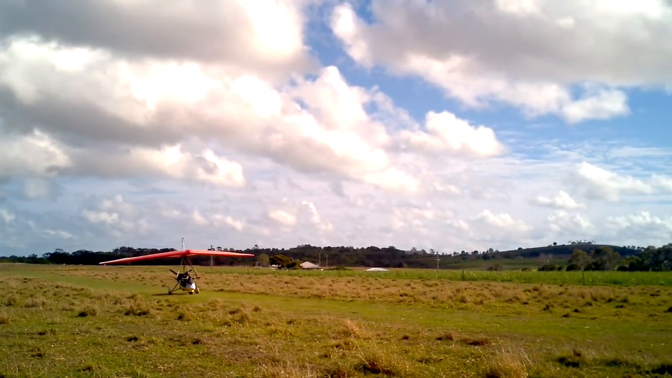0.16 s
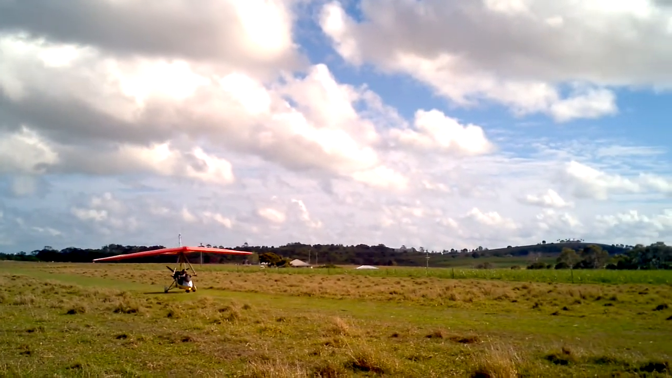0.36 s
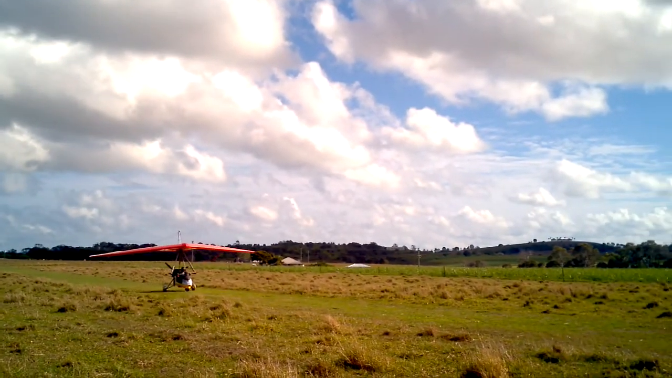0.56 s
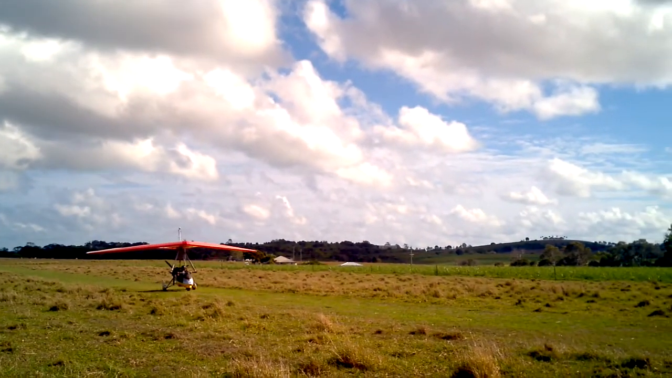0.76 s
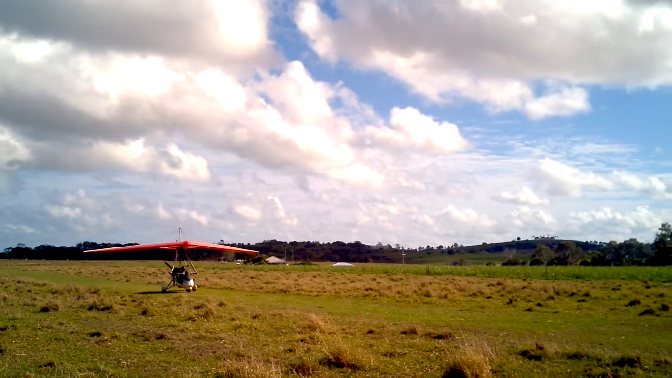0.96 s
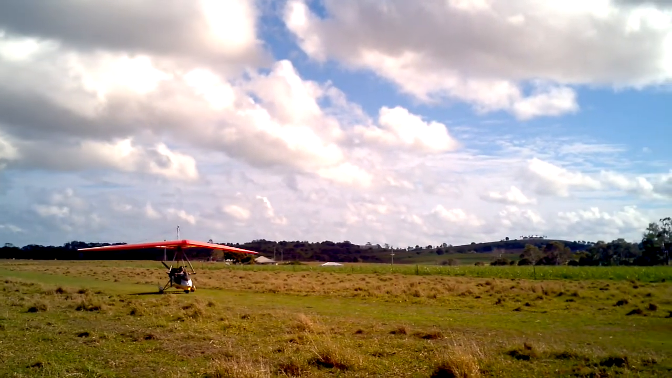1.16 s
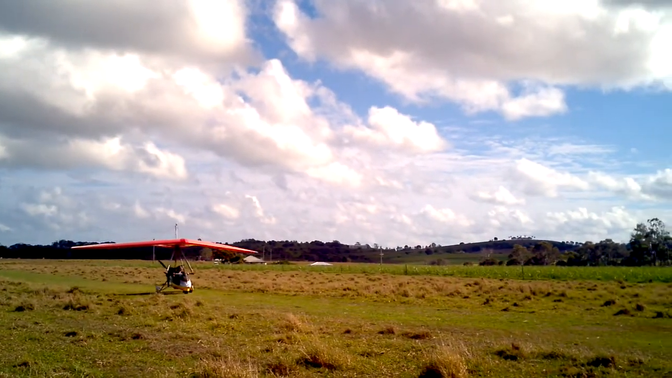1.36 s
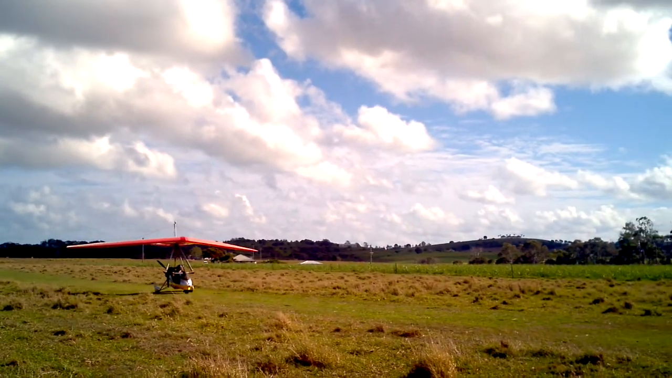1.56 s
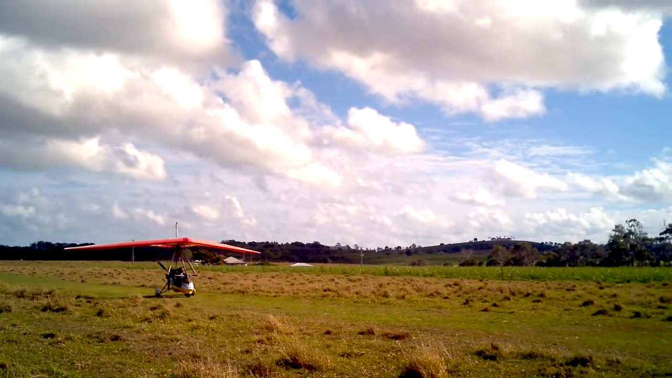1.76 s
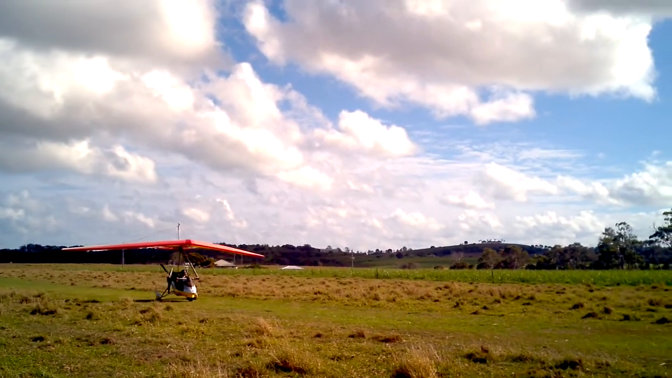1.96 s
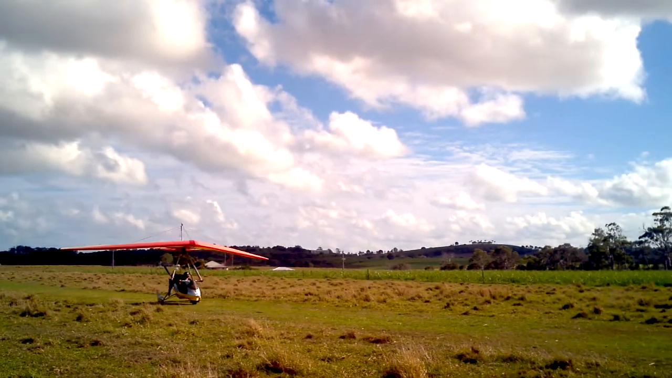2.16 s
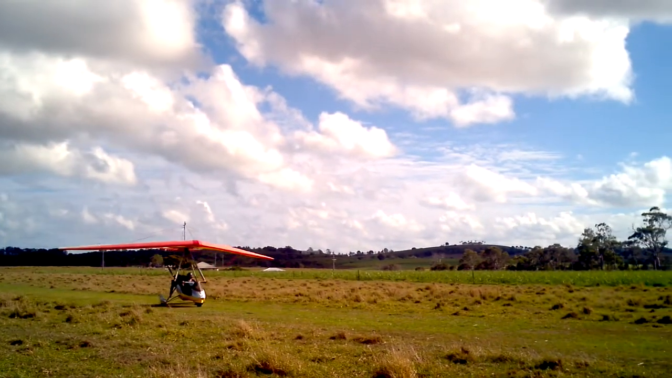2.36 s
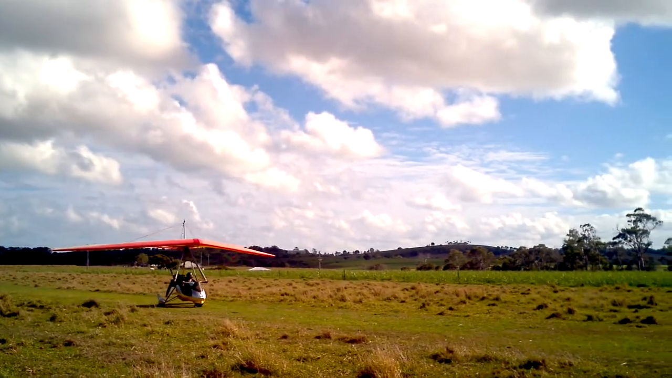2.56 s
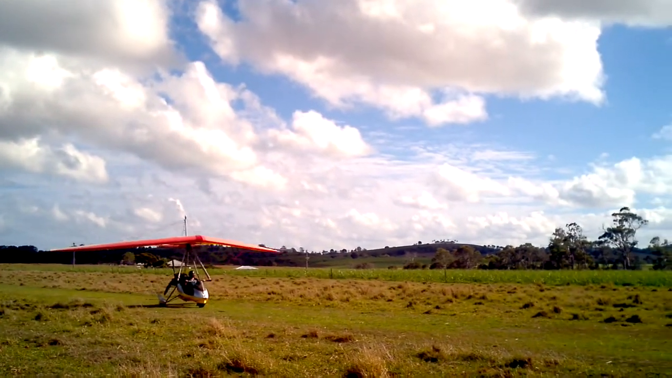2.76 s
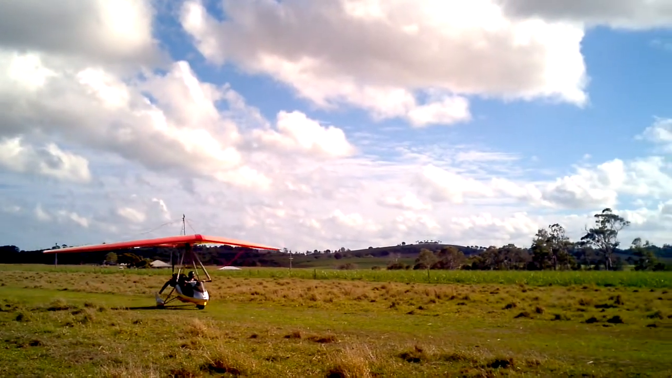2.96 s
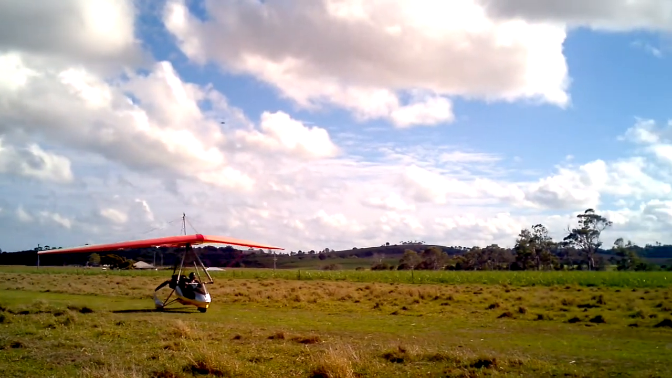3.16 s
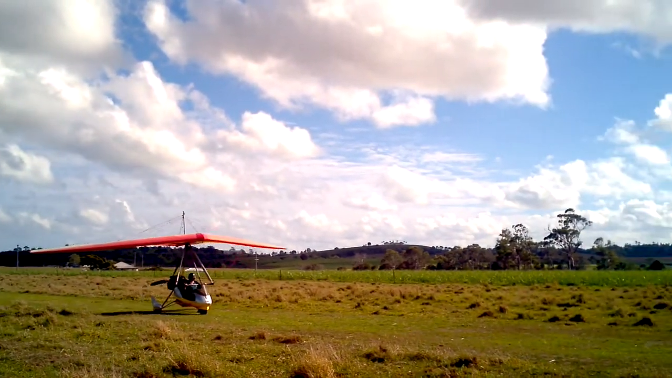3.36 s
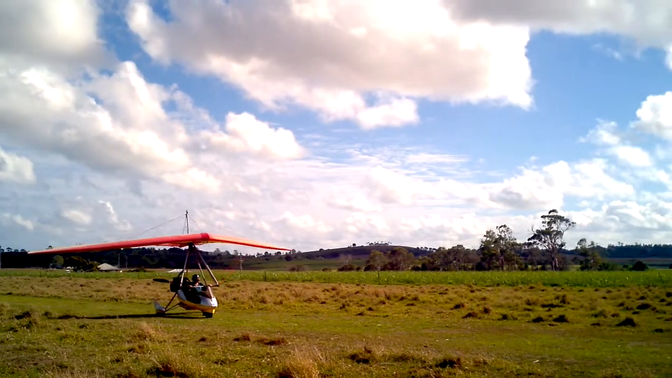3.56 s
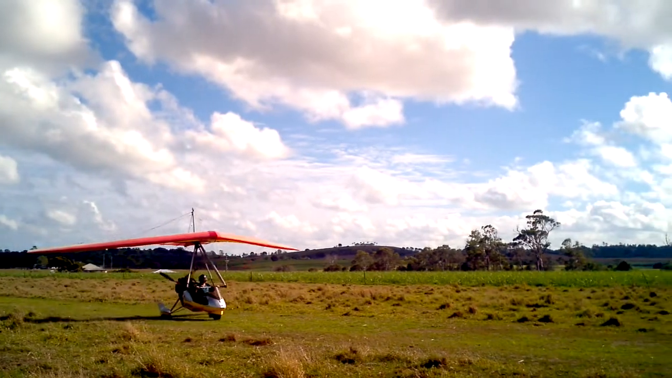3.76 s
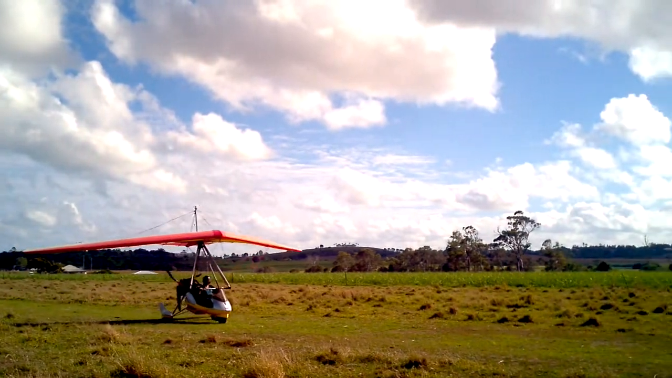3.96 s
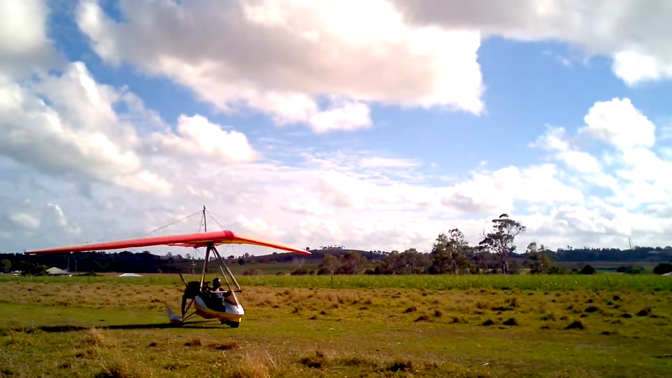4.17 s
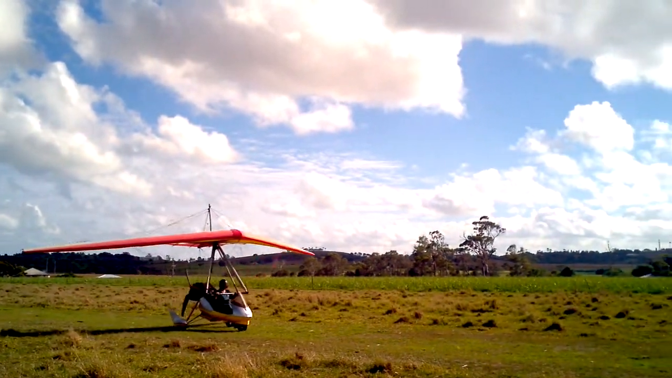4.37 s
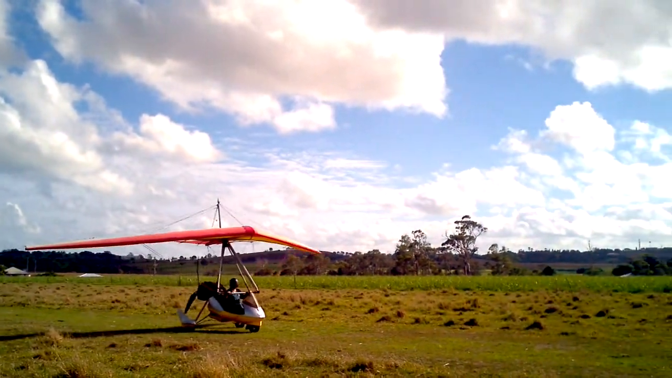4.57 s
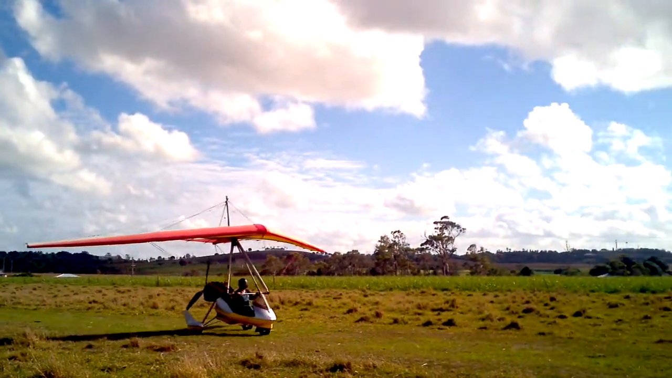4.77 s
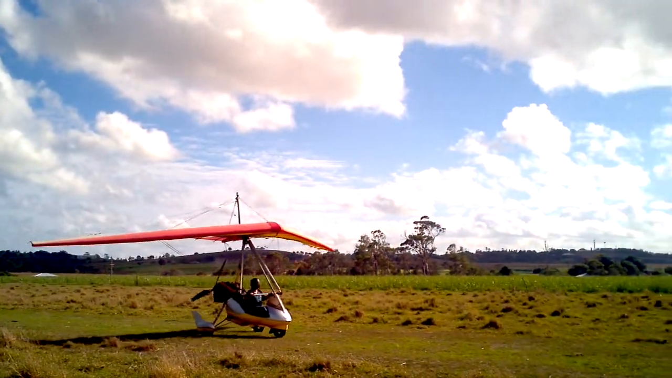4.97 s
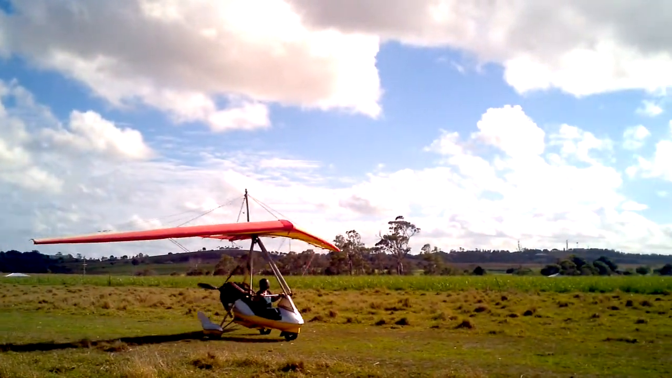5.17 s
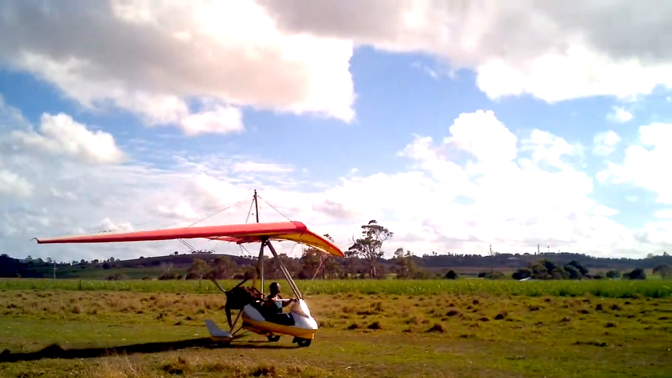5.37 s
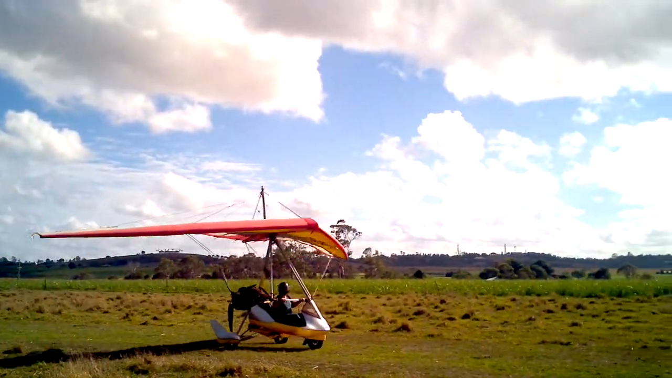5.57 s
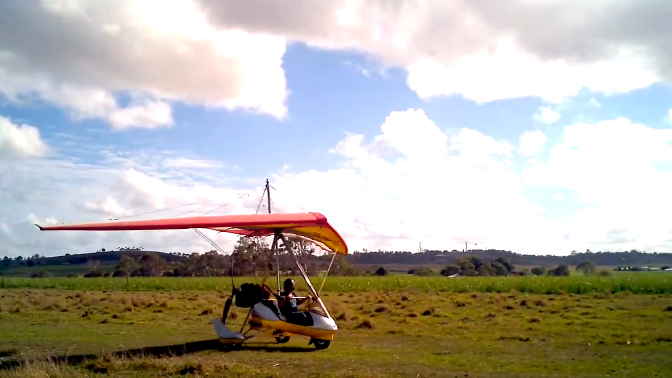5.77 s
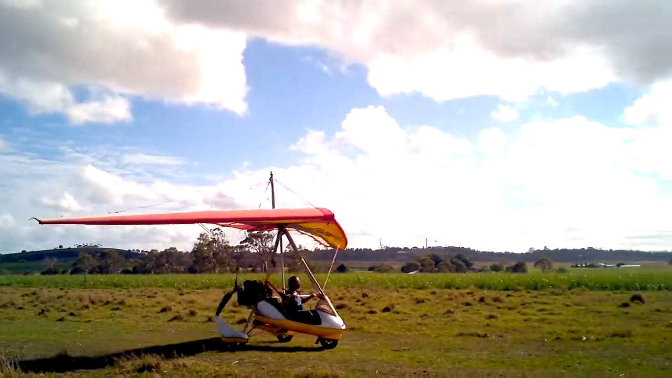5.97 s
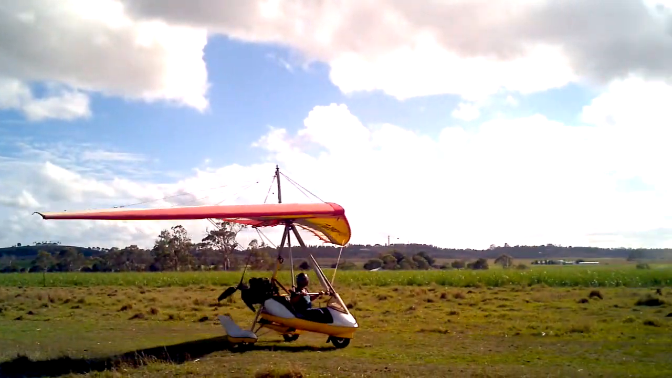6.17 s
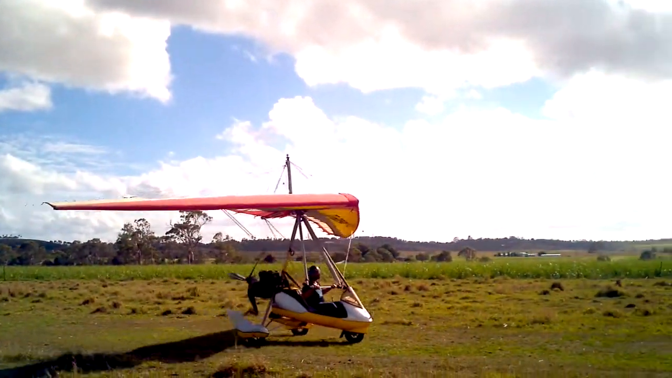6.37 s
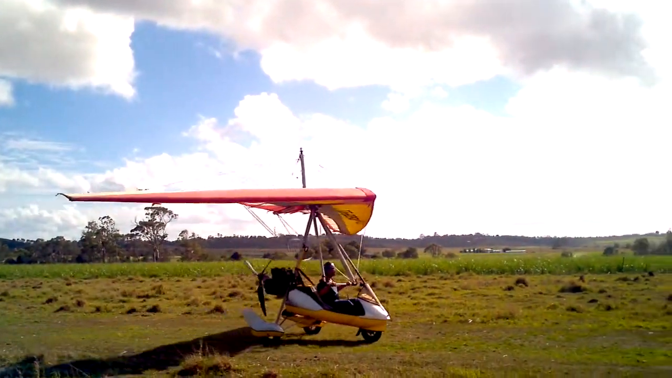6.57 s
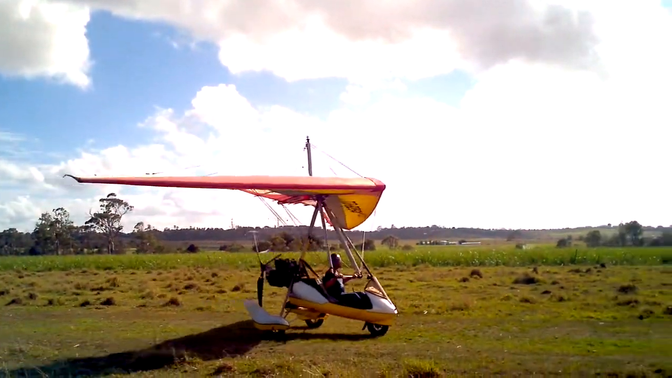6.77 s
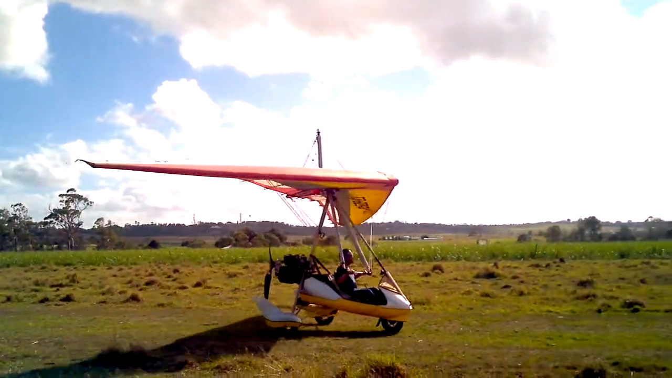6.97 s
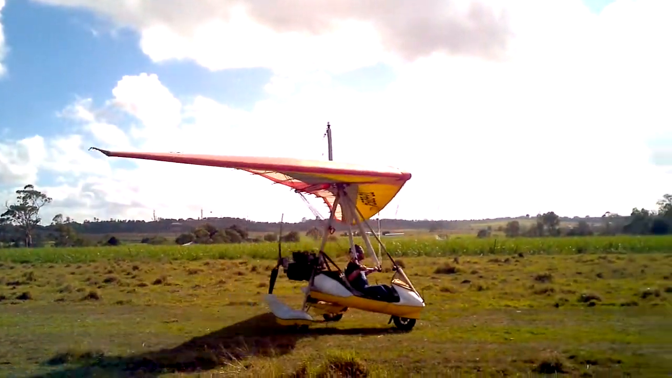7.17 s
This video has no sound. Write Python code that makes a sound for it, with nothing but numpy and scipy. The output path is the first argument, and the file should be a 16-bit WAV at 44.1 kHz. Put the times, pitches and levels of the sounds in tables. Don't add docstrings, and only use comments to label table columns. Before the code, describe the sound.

A faint low engine hum and airy hush come first, broken by soft low wind bumps on a hand-held camera microphone. The small propeller aircraft rolls nearer over rough grass, its steady idle drone swelling into a coarse, fluttering, rattling roar with quick bumps in level. Strong blunt wind thuds land late, over the close engine. Open air, no echo, somewhat thin stereo sound.

```python
import sys
import numpy as np
from scipy import signal
from scipy.fft import rfft, irfft, next_fast_len
from scipy.io import wavfile
from scipy.ndimage import uniform_filter1d

SR = 44100
rng = np.random.default_rng(int(sys.argv[2]) if len(sys.argv) > 2 else 0)


def amplitude_ratio(level_db):
    exponent = np.asarray(level_db, float) / 20
    return 10 ** exponent


def digitize_waveform(pressure):
    field = np.atleast_2d(pressure).T
    bounded = np.clip(field, -1, 1)
    quanta = np.round(bounded * 32767).astype(np.int16)
    wavfile.write(sys.argv[1], SR, quanta)


N = 318604
T = np.arange(N) / SR


def evened(x):
    return x / np.sqrt(np.mean(x ** 2) + 1e-20)


def curves(rows, t):
    s, *columns = np.transpose(rows)
    return [np.interp(t, s, c) for c in columns]


def read(points, hz, order=1):
    table = np.transpose(points)
    return np.interp(np.log(hz + 1), np.log(table[0] + 1), table[order])


def coloured(x, points):
    length = x.shape[-1]
    size = next_fast_len(length)
    gain = amplitude_ratio(read(points, np.fft.rfftfreq(size, 1 / SR)))
    return evened(irfft(rfft(x, size) * gain, size)[..., :length])


def drift(hz, count=1):
    noise = rng.standard_normal((count, N))
    return evened(signal.sosfilt(signal.butter(2, hz, fs=SR, output="sos"), noise))


def flutter(low_hz, high_hz):
    band = signal.butter(2, [low_hz, high_hz], "band", fs=SR, output="sos")
    return evened(signal.sosfilt(band, rng.standard_normal(N)))


def field():
    return amplitude_ratio(-61.5) * coloured(rng.standard_normal(N), [(40, 14), (90, 6), (200, -6.0), (400, -27.5)])


# (time [s], firing rate [Hz], exhaust level [dB], propeller and gear roar level [dB])
ENGINE_APPROACH = [(0, 70.34, -55.5, -60), (.6, 71, -54, -61.5), (1.2, 70.5, -51, -56),
                   (1.55, 71.1, -51, -51.5), (1.95, 70.8, -49, -47.5), (2.5, 69.7, -48, -47),
                   (3.0, 68.84, -44, -43), (3.45, 68.98, -42.5, -42), (4.1, 69.24, -41.5, -41.5),
                   (4.63, 68.9, -42.5, -38.5), (5.1, 67.84, -38.5, -34.5), (5.48, 67.6, -37.5, -36.5),
                   (5.75, 67.96, -37.5, -33.5), (6.1, 67.6, -35, -33.3), (6.45, 69.1, -38.5, -34.5),
                   (6.8, 68.07, -38, -36), (7.05, 67.13, -38, -35.5), (7.22, 68, -36.5, -36.5)]


def firing():
    rate_hz = curves(ENGINE_APPROACH, T)[0]
    turns = np.cumsum(rate_hz * (1.003 + 0.00446 * drift(4.84)[0])) / SR
    count = np.arange(600)
    cylinder = np.cos(np.pi * count / 2 + 0.24 * np.cumsum(rng.standard_normal(600)))
    strength = cylinder + 0.065 * rng.standard_normal(600)
    throb = evened(uniform_filter1d(np.interp(turns, count, strength), 300))
    return turns, throb


# (multiple of firing rate, level over the second order [dB])
WEAK_ORDERS = [(1, -33.5), (5, -48.5), (6, -79)]
# (frequency [Hz], level per Hz [dB])
EXHAUST_RUMBLE = [(50, -36), (90, -8.5), (125, 4.5), (200, 3.5), (290, -10), (340, -25), (500, -43)]
# (time [s], travel time from port to port [us], nearness [0-1])
AIRCRAFT_BEARING = [
    (0, 147, 0),
    (1.5, 163, 0.51),
    (3.7, 158, 1),
    (5.1, 136.3, 0.82),
    (5.7, 135.3, 1),
    (7.2, 117, 1),
]
# (frequency [Hz], detour factor on the port delay, likeness of ports [0-1], first port over second [dB])
CAMERA_BODY = [(200, 1.3, 0.84, -3.5), (1145, 0.8, 1, 6), (2145, 1.28, 0.88, 2.5), (2780, 0.95, 0.6, -4),
               (3260, 0.34, 0, 12.5), (4606, 0.87, 0.61, -1.5), (6980, 1.236, .6, 1.5),
               (8080, 1.43, 0.82, 14), (9830, 1.44, 0.42, 5.5), (15500, 1.32, 0.95, -16.5)]


def exhaust(turns, throb):
    hz, second, _ = curves(ENGINE_APPROACH, T)
    rise = second + 45
    third = second - 1.5 + 0.17 * rise
    fourth = second - 12 + 0.017 * rise + 2.5 * drift(3.6)[0]
    orders = [(2, second + 10.64), (3, third + 6.24), (4, fourth + 5)]
    orders += [(k, second + 10 + db) for k, db in WEAK_ORDERS]
    delay = curves(AIRCRAFT_BEARING, T)[0] * 1e-6 * read(CAMERA_BODY, hz * 2)
    late = np.array([[.5], [-.5]]) * delay * hz
    sway = drift(3.7, count=len(orders))
    phase_turns = turns + late + 0.016 * throb
    tones = 0
    for i, (k, db) in enumerate(orders):
        wave = np.sin(2 * np.pi * k * phase_turns + 8.85 * rng.random())
        tones = tones + amplitude_ratio(db + 0.29 * sway[i]) * np.sqrt(2) * wave
    rumble = amplitude_ratio(second + 3.5) * coloured(rng.standard_normal(N), EXHAUST_RUMBLE)
    rumble = np.array([np.interp(T + side * delay, T, rumble) for side in (.5, -.5)])
    return tones * amplitude_ratio(1.5 * throb) + rumble * amplitude_ratio(0.12 * throb)


# (frequency [Hz], width [Hz], depth [0-1], glide with bearing [exponent], growth with bearing [exponent])
CREEPING_SHADOW = [(3630, 140, .93, 0, -3), (4620, 100, .85, .6, 2.2)]


def airborne(level_db):
    bins, frames = level_db.shape
    hz, t = np.fft.rfftfreq(512, 1 / SR)[:, None], (np.arange(frames) * 128) / SR
    a, b, c, d = rng.standard_normal((frames, bins, 4)).T
    shared, private = a + 1j * b, c + 1j * d
    delay_us = curves(AIRCRAFT_BEARING, t)[0]
    like = np.clip(read(CAMERA_BODY, hz, order=2), 0, 1)
    lag = np.exp(-2j * np.pi * hz * delay_us * 1e-6 * read(CAMERA_BODY, hz))
    shade = amplitude_ratio(np.multiply.outer([.5, -.5], read(CAMERA_BODY, hz, order=3)))
    z = np.array([shared, lag * (like * shared + np.sqrt(1 - like ** 2) * private)]) * shade
    turned = 150 / delay_us
    cancel = 0
    for f, width, depth, glide, grow in CREEPING_SHADOW:
        offset = (hz - f * turned ** glide) / (width * turned ** grow)
        cancel = cancel + depth * turned ** grow * np.exp(-offset ** 2)
    z = z - np.clip(cancel, 0, 1) * z.mean(0)
    return signal.istft(z * amplitude_ratio(level_db - 17.5), nperseg=512, noverlap=384)[1][:, :N]


# (frequency [Hz], level per Hz [dB])
FAR_SPECTRUM = [(350, 0.0), (700, -7.8), (1050, -8.5), (1250, -8.7), (1750, -5.3), (2200, -8.0),
                (2600, -11.8), (3600, -21.3), (5100, -19.0), (6600, -20.2), (8100, -12.4), (9600, -18.9),
                (11100, -26.5), (14000, -28.7)]
# (frequency [Hz], level per Hz [dB])
NEAR_SPECTRUM = [(350, -0.2), (700, -5.2), (1050, -4.3), (1250, -3.4), (1750, -0.1), (2200, 0.0),
                 (2600, -10.0), (3600, -12.0), (5100, -15.3), (6600, -11.6), (8100, -11.9), (9600, -13.5),
                 (11100, -20.9), (14000, -23.0)]
# (frequency [Hz], level per Hz [dB])
FIELD_HUSH = [(350, -18), (700, 1), (1050, -13), (1250, 8), (1750, -45), (2200, -55), (2600, -29),
              (3600, -31), (5100, -40), (6600, -38), (8100, -19), (9600, -10), (11100, -36), (14000, -43)]
# (frequency [Hz], width [Hz], level [dB])
PORT_CAVITY = [(570, 27, -2), (1610, 64, -11), (1970, 73, 3), (2840, 110, -6.5), (3980, 330, -2.5),
               (7120, 390, -7.5), (8730, 720, -5)]
# (time [s], extra roar level [dB])
TUSSOCK_JOLTS = [(1.421, 6), (1.91, 4), (2.02, 1.5), (3.392, 5.5), (3.76, 3.5), (3.92, -0.5), (4.08, 0),
                 (4.14, 4), (5.191, 3), (5.399, 3), (5.64, 4.5), (5.71, 3), (5.78, 2), (5.87, 2), (5.92, 3),
                 (6.2, 3), (6.349, 2.5), (7.14, 3.5), (7.2, 4.5)]


def roar(turns, throb):
    at = np.minimum(np.arange(N // 128 + 6) * 128, N - 1)
    hz, t = np.fft.rfftfreq(512, 1 / SR)[:, None], T[at]
    swell_db = 0.44 * drift(6)[0][at]
    level_db, treble_db = curves(ENGINE_APPROACH, t)[2] + swell_db, -7.5 - swell_db
    near = curves(AIRCRAFT_BEARING, t)[1]
    air_db = (-7.5 + 3 * near) * np.clip((hz - 9500) / 4000, 0, 1.3)
    low_cut = -30 * np.clip(1 - hz / 330, 0, 1)
    far_db, near_db = read(FAR_SPECTRUM, hz) + 7, read(NEAR_SPECTRUM, hz) + 4
    shape = (1 - near) * far_db + near * near_db + low_cut + air_db
    high = np.clip(np.log(hz / 2400 + 1e-3) / np.log(2.6), 0, 1)
    blades = np.cos(2 * np.pi * (0.38 * turns + 0.015 * drift(2.4)[0]))[at]
    bangs = .7 * np.cos(2 * np.pi * turns)[at]
    shimmer = flutter(6.7, 29)[at]
    patches = uniform_filter1d(rng.standard_normal((len(t), 257)).T, 16, 0)
    patches = evened(uniform_filter1d(patches, 5, 1))
    beat = (0.13 + 0.077 * high) * throb[at] + (0.88 + 0.2 * high) * blades
    beat = beat + (0.47 + 1.13 * high) * shimmer + bangs
    jolts_db = sum(db * np.exp(-((t - s) / 0.013) ** 2) for s, db in TUSSOCK_JOLTS)
    engine_db = shape + level_db + high * (treble_db + 9) + jolts_db + beat + 1.52 * patches - 0.5
    hush_db = read(FIELD_HUSH, hz) + low_cut - 76
    cavity_db = sum(db * np.exp(-((hz - f) / width) ** 2) for f, width, db in PORT_CAVITY)
    return airborne(10 * np.log10(amplitude_ratio(engine_db) ** 2 + amplitude_ratio(hush_db) ** 2) + cavity_db)


# (time [s], rumble level at the top [dB], half length [s])
WIND_GUSTS = [(.12, -47, 0.2), (0.65, -36, 0.19), (.88, -46, .18), (1.08, -37, 0.081), (1.185, -31, .05),
              (1.777, -44, .15), (2.163, -34.5, 0.29), (2.88, -40, 0.1), (4.35, -42, .11),
              (4.803, -33, 0.19), (5.15, -43, 0.34), (5.717, -40, 0.32), (6.385, -26, 0.11),
              (6.514, -28, 0.081), (6.857, -34.5, 0.18), (7.205, -32, .12)]


def gusts(t):
    humps = sum(amplitude_ratio(db - 11.5 * ((t - s) / half) ** 2) ** 2 for s, db, half in WIND_GUSTS)
    return 10 * np.log10(amplitude_ratio(-50) ** 2 + humps)


def eddies():
    per_s = 40
    place, size, pitch = rng.random((round(per_s * T[-1]), 3)).T
    s = (np.arange(len(place)) + place) / per_s
    level_db = gusts(s) + 5 + 10 * (2 * size - 1)
    centre_hz = 155.4 + 24 * (pitch ** 2 - 1 / 3)
    return np.transpose([s, level_db, centre_hz])


def thud_of(db, hz, phase, spread):
    turns = np.arange(-3, 3, hz / SR)
    swing = np.sin(2 * np.pi * (turns - 0.099 * turns ** 2 + phase))
    swing = swing * np.exp(-(turns / (0.59 + 0.2 * spread)) ** 2)
    snap = 0.19 * np.sin(2 * np.pi * (1.09 * turns + 3 * phase)) * np.exp(-(turns / 0.66) ** 2)
    crack = np.sin(2 * np.pi * 5.1 * turns) * np.exp(-(turns / 0.13) ** 2)
    return amplitude_ratio(db) * (swing + snap + amplitude_ratio(db / 2 - 21) * crack)


# (time [s], peak level [dB], centre frequency [Hz])
HARD_BLOWS = [(0.098, -24.5, 186), (0.611, -20.5, 227), (.627, -25, 169), (.683, -25.5, 153),
              (0.705, -21.5, 170), (0.802, -25, 207), (.82, -20.9, 175), (0.927, -23.5, 199),
              (.966, -22.5, 182), (1.021, -22, 202), (1.065, -16.5, 221), (1.071, -20.5, 308),
              (1.076, -16.5, 209), (1.094, -18.5, 152), (1.161, -20.5, 183), (1.173, -13, 196),
              (1.188, -24, 196), (1.788, -20.5, 233), (1.996, -22.9, 275), (2.041, -21.5, 215),
              (2.074, -21.5, 245), (2.145, -30, 162), (2.326, -23.5, 230), (2.342, -23, 201),
              (4.761, -17, 189), (6.364, -8.5, 175), (6.509, -10, 190.8), (6.55, -12.5, 190),
              (6.83, -15.4, 157), (6.875, -12, 179)]
# (frequency [Hz], level per Hz [dB])
WIND_RUMBLE = [(30, 6), (65, -32), (90, 6), (150, 10.5), (210, -22), (300, -8), (420, -15), (620, -30),
               (1000, -71.5)]
# (frequency [Hz], level per Hz [dB])
GRILLE_SHUDDER = [(60, -40), (120, -14), (220, 0), (380, -2), (560, -12), (900, -34), (1500, -90)]


def wind():
    rumble_gain = amplitude_ratio(gusts(T) + 3.0 + 3.3 * drift(26.0, count=2))
    out = rumble_gain * coloured(rng.standard_normal((2, N)), WIND_RUMBLE) / 2
    shake = sum(amplitude_ratio(db - 21) * np.exp(-((T - s) / .01) ** 2) for s, db, _ in HARD_BLOWS)
    out = out + shake * coloured(rng.standard_normal((2, N)), GRILLE_SHUDDER)
    blows = np.vstack([HARD_BLOWS, eddies()])
    for (s, db, hz), (port, phase, spread) in zip(blows, rng.random((len(blows), 3))):
        thud = thud_of(db, hz, phase, spread)
        start = round(s * SR) - len(thud) // 2
        part = out[int(port > .5), max(start, 0):start + len(thud)]
        part += thud[max(-start, 0):][:len(part)]
    return out


def murmur():
    return amplitude_ratio(-80) * coloured(rng.standard_normal(N), [(10, 26), (45, 13), (70, 24), (120, -58)])


def scene():
    turns, throb = firing()
    return field() + exhaust(turns, throb) + roar(turns, throb) + wind()


def band_limit(x):
    return signal.sosfilt(signal.butter(12, 15910, fs=SR, output="sos"), x)


# (frequency [Hz], level [dB])
BASS_RESPONSE = [(20, -50), (45, -4), (70, 2), (100, 1)]


def record(dry):
    size = next_fast_len(N + 4096)
    hz, ports = np.fft.rfftfreq(size, 1 / SR), rfft(dry, size)
    late = np.exp(-2j * np.pi * hz / 2945)
    passed = amplitude_ratio(read(BASS_RESPONSE, hz)) * (hz < 15760)
    stereo = irfft((ports - late * ports[::-1]) * passed, size)[:, :N] + murmur()
    return band_limit(stereo)


dry = scene()
out = record(dry)
digitize_waveform(out)
```